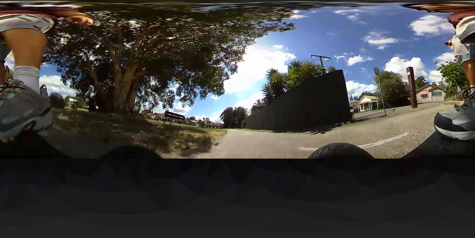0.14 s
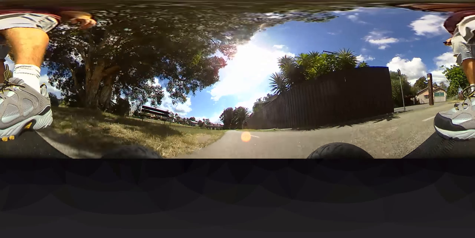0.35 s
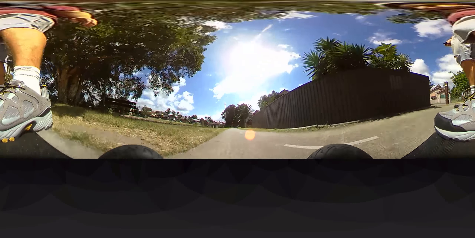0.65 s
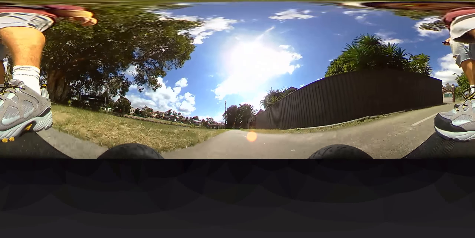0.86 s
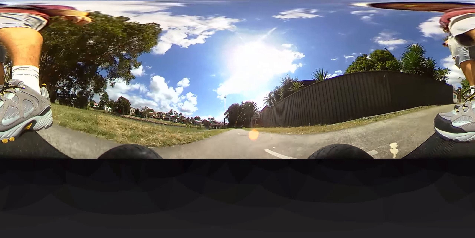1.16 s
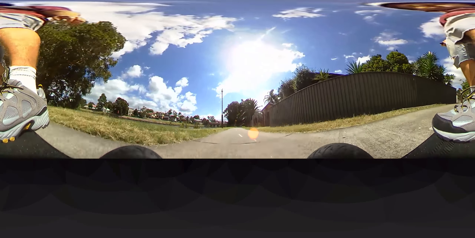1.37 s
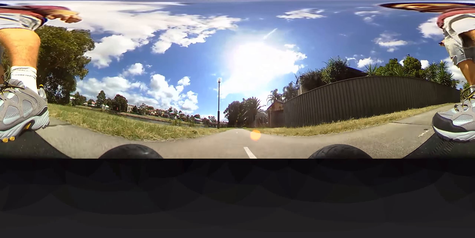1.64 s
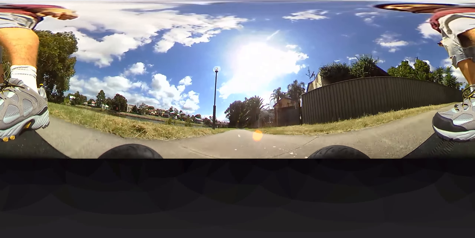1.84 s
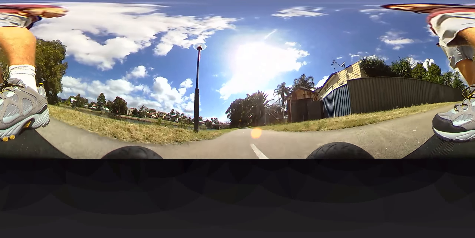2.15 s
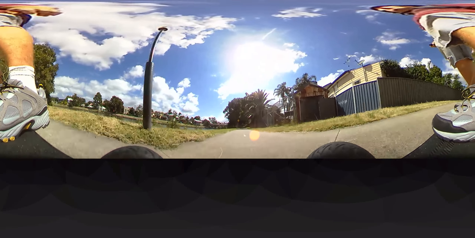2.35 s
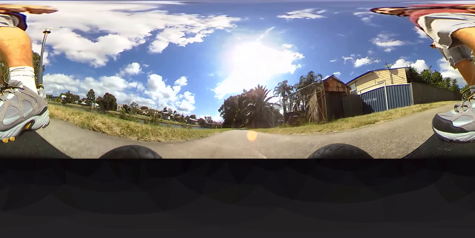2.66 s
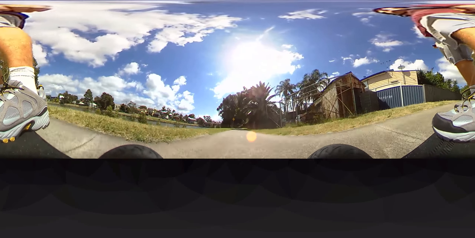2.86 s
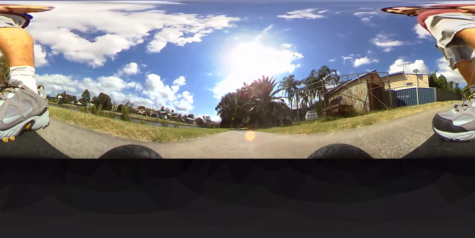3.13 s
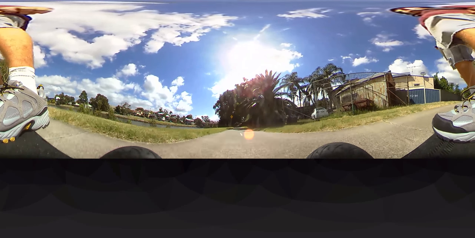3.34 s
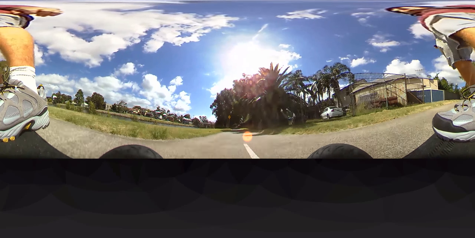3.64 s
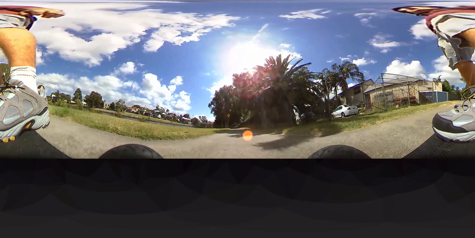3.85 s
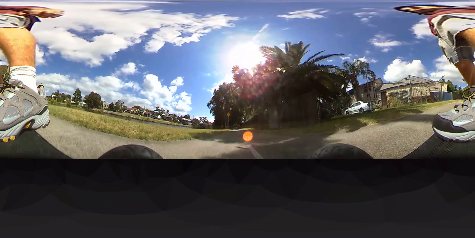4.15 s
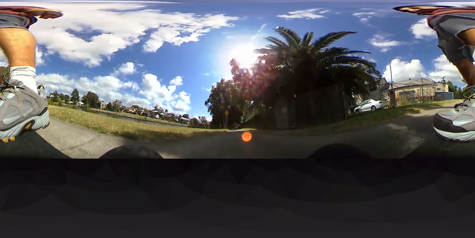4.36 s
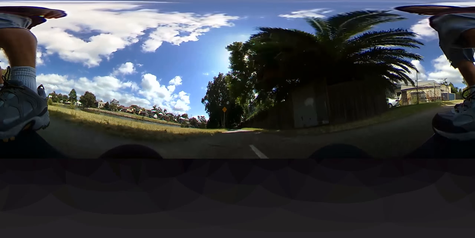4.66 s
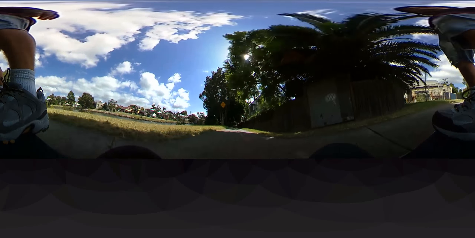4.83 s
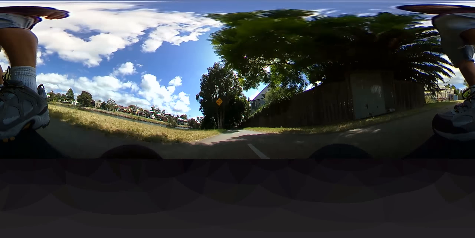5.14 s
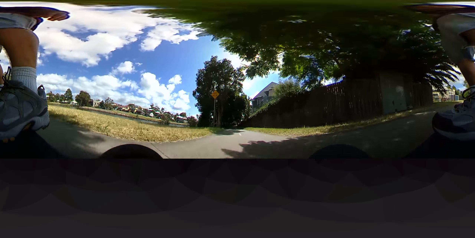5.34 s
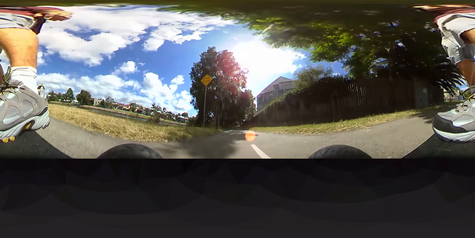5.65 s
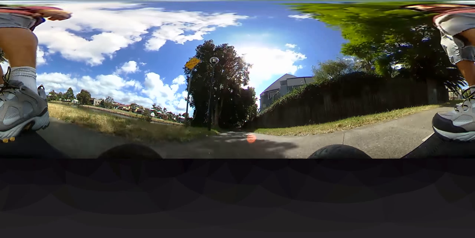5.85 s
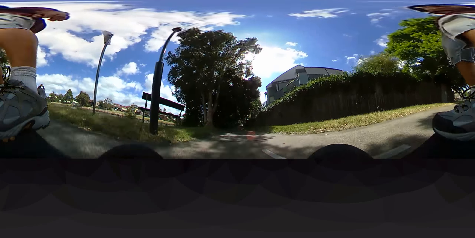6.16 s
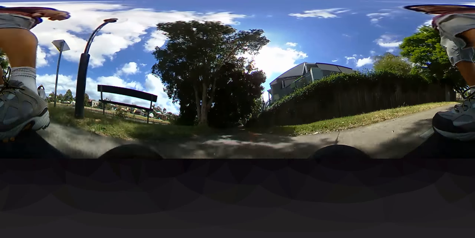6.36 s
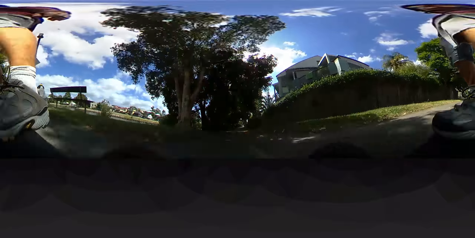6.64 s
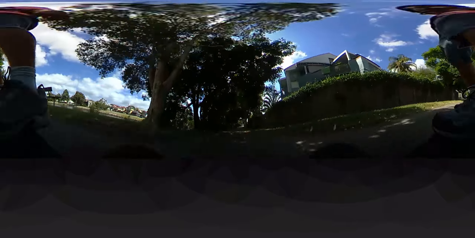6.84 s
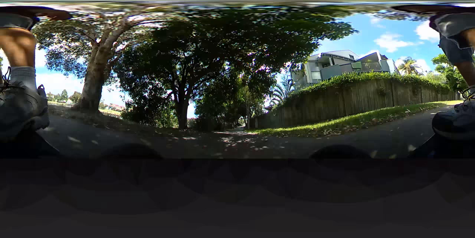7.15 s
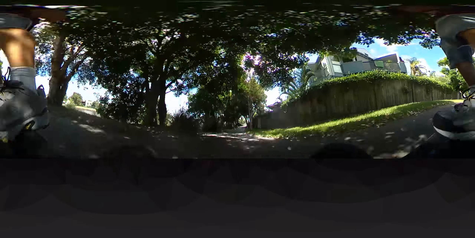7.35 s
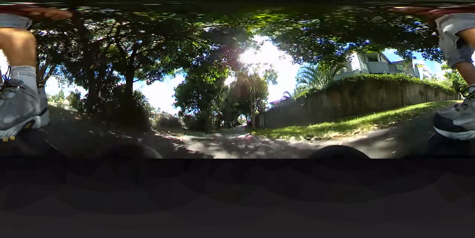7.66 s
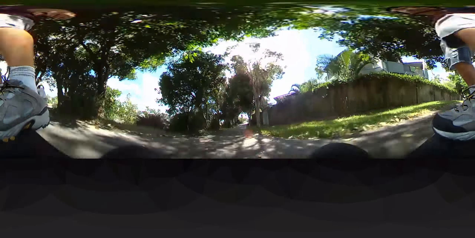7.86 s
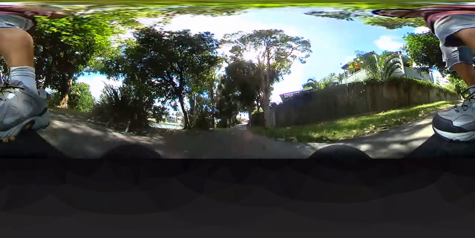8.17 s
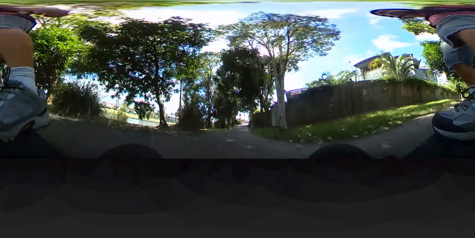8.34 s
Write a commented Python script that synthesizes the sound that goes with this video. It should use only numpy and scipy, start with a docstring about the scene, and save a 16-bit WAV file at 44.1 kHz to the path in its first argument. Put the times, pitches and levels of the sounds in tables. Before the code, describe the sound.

Continuous close, bass-heavy rumble of soft skateboard wheels on rough paving, wavering between deck flutter and a roughly 65 hertz motor hum. A faint, blurred whine near 1 kilohertz rises very slightly. A loose plastic case snaps, ticks and rattles at uneven intervals, while cracks give short hard thuds and stones knock the axles. The deck-mounted microphone sounds compressed, slightly clipped and dry, outdoors.

```python
"""Rough paving, over which an electric skateboard rolls fast, heard by a camera fixed to the deck.
Filtered noise gives the tyre roar, the hiss of grit and the bending resonances of the deck; phase-wandering
sines give the hum of the motor shaft and the whine of its belt. Cracks push and stones knock; the loose
camera case clicks, ticks and rattles as struck modes, and a far bird warbles twice.
A quick gain control holds the level nearly flat."""
import sys
import numpy as np
from scipy import signal
from scipy.io import wavfile
from scipy.ndimage import uniform_filter1d

SR = 44100
rng = np.random.default_rng(int(sys.argv[2]) if len(sys.argv) > 2 else 0)


def waveform_to_disk(signal):
    """Save audio, clipped to [-1, 1], as 16-bit WAV at the path in sys.argv[1]."""
    frames = np.transpose(np.atleast_2d(signal))
    scaled = np.clip(frames, -1, 1) * 32767
    samples = np.round(scaled).astype(np.int16)
    wavfile.write(sys.argv[1], SR, samples)


N = 374850
TIME = np.arange(N) / SR  # s

# All source levels hold ahead of the gain control.
# Rotation of the motor shaft. Each row: time in seconds, speed in Hz.
SHAFT_SPEED = [(0, 62.9), (.55, 63.1), (1, 62.3), (1.6, 63.6), (2, 63.8), (2.3, 64.5), (2.55, 65.5),
               (3.3, 65.8), (3.6, 66.1), (5.1, 66.3), (5.28, 65.8), (5.9, 66.6), (6.2, 65.8), (6.5, 66.7),
               (7, 65.4), (7.3, 66), (7.56, 65.05), (7.9, 65.7), (8.25, 66.7), (8.5, 66.3)]
TEETH, BUZZ_ORDER = 15, 23.5  # belt teeth per shaft turn; the buzz, in multiples of the shaft speed
# Levels of the ride. Each row: time in seconds, deck flex in dB, shaft hum in dB, tyre roar in dB.
RIDE_LEVELS = [(0, -22.5, -25, -24), (.15, -22, -21, -19.5), (.7, -21, -25.5, -19.5),
               (.9, -19, -17.5, -17.5), (1.2, -30, -17.5, -19), (1.45, -26, -24, -26),
               (1.8, -15, -34.5, -23.5), (2.3, -20.5, -18.5, -21.5), (2.6, -30, -22, -21),
               (3, -14.5, -23.5, -22), (3.3, -26, -22.5, -21), (3.45, -29.5, -29.5, -24),
               (3.6, -28.5, -24.5, -20.5), (3.9, -15.5, -23, -20), (4.3, -28.5, -27, -21),
               (4.48, -30, -15, -18), (4.7, -18.5, -28.5, -20.5), (4.95, -24, -38.5, -21.5),
               (5.25, -23, -23.5, -22.5), (5.65, -26, -20, -20), (5.85, -39.5, -21.5, -19.5),
               (6.15, -31, -16.5, -23), (6.4, -21, -24, -20.5), (6.7, -22, -26, -17.5),
               (6.9, -32.5, -15, -17), (7.15, -15.5, -26, -21), (7.38, -29, -22.5, -18.5),
               (7.7, -14, -33.5, -20), (8, -14.5, -30, -21), (8.15, -31.5, -22, -21),
               (8.45, -17, -33, -21.5), (8.5, -40, -37, -26)]
# Levels of belt and grit. Each row: time in seconds, belt whine in dB, its octave in dB, fizz in dB.
WHINE_LEVELS = [(0, -60, -69, -75), (.2, -49, -60, -89), (.45, -51, -63.5, -71), (.73, -52.5, -58, -70),
                (1.06, -51, -60.5, -69.5), (1.5, -56, -73, -74), (2.01, -49, -63.5, -73),
                (2.8, -52, -68.5, -74), (4.3, -49.5, -70, -78.5), (4.95, -50.5, -67, -68),
                (5.3, -50, -67.5, -78), (5.9, -48, -64.5, -77), (6.3, -50.5, -65.5, -79),
                (6.6, -49.5, -75, -75), (7.3, -49, -67, -71.5), (7.9, -50.5, -70, -69.5),
                (8.5, -50, -71, -79)]
# Noise bands about the belt tone, its octave and the buzz.
# Each row: width in Hz, level in dB above the tone that it follows.
FUZZ_BANDS = [(60, -9.5), (70, -8.5), (59, -1.5)]
# Bending modes of the deck. Each row: frequency in Hz, width scale in Hz, relative level in dB.
DECK_MODES = [(32.5, 13, -9), (39.12, 6.8, 0), (51.7, 8.2, -9.5)]
# Spectrum of the tyre roar. Each row: frequency in Hz, relative density in dB per Hz.
ROAR_SPECTRUM = [(40, -31), (85, -10), (113, -4.5), (170, -5), (220, 2), (298, -8), (430, -6.5), (540, -18),
                 (660, -24.5), (800, -35.5), (1000, -35), (1250, -49), (1540, -44), (1770, -54.5),
                 (1980, -52), (2380, -54), (2650, -80), (6000, -73.5)]
# Spectrum of the hiss of grit. Each row: frequency in Hz, relative density in dB per Hz.
HISS_SPECTRUM = [(1470, -32), (2500, 2.5), (3410, -15), (4300, -1), (5640, 2.5), (8040, -8), (13500, -14),
                 (14600, -11.5), (15100, -50.5)]
# The wheels unload over a seam. Each row: time in seconds, length in seconds, depth in dB.
SEAM_LIFTS = [(1.037, 0.27, -10), (4.832, 0.065, -12), (6.433, 0.08, -14), (7.906, 0.065, -11)]
# A loose part rattles lightly inside the case. Each row: time in seconds, level in dB.
RATTLE_BLOWS = [(0.1264, -45), (0.1434, -42), (0.1764, -47), (0.1874, -47), (0.1964, -44), (0.1994, -45),
                (0.2064, -42), (0.3864, -54), (0.396, -38), (0.5756, -43), (0.637, -41), (0.6644, -48),
                (1.0355, -52), (1.6387, -51), (1.7005, -44), (1.7848, -38), (1.8507, -35), (1.8981, -57),
                (2.2588, -45), (2.4728, -44), (3.2016, -57), (3.3104, -49), (3.3274, -47), (3.3404, -52),
                (3.3942, -57), (3.457, -51), (3.5967, -58), (3.7229, -47), (3.7324, -44), (3.7928, -46),
                (3.8354, -47), (3.9174, -60), (4.0617, -42), (4.8504, -48), (5.0814, -51), (5.2944, -51),
                (5.3702, -60), (5.6057, -45.5), (5.7982, -54), (5.9663, -66), (5.9824, -54), (6.0392, -47),
                (6.0674, -58), (6.1145, -64), (6.1424, -63), (6.2644, -49), (6.2774, -45), (6.376, -50),
                (6.3795, -44), (6.3885, -44), (6.398, -46), (6.4477, -72), (6.5939, -42), (6.8568, -54),
                (7.3557, -44), (7.5622, -57), (7.664, -47), (7.8446, -46), (8.1938, -46), (8.3384, -51)]
# Modes of the loose part. Each row: frequency in Hz, level in dB, decay time t60 in seconds.
RATTLE_MODES = [(4370, -1, 0.0075), (5140, -5.5, 0.0019), (6040, -2.5, 0.0034), (7900, -4, 0.0027)]
# The case falls back on a softer stop. Each row: time in seconds, level in dB.
TICK_BLOWS = [(0.1206, -52), (0.1511, -34), (0.2523, -45), (0.2833, -50), (0.3142, -38), (0.3476, -40),
              (0.3785, -39), (0.4489, -55), (0.4803, -44), (0.7936, -43), (0.946, -43), (1.257, -47),
              (1.536, -51), (1.5663, -49), (1.6008, -31), (1.731, -37), (1.7749, -51), (1.8078, -48),
              (1.9028, -54), (2.0104, -44), (2.1115, -40), (2.1405, -40), (2.1755, -51), (2.381, -46),
              (2.4892, -41), (2.525, -38), (2.6439, -48), (2.7662, -50), (3.2181, -42), (3.252, -37),
              (3.3194, -41), (3.3523, -46), (3.441, -40), (3.4755, -40), (3.5114, -43), (3.6404, -45),
              (3.6716, -36), (3.7055, -42), (3.7394, -43), (3.8416, -45), (3.928, -53), (3.9992, -39),
              (4.119, -42), (4.2916, -33), (4.5994, -52), (4.8045, -41), (4.8709, -39.5), (4.8993, -41),
              (4.996, -42), (5.094, -43), (5.1262, -40), (5.637, -40), (5.666, -45), (5.7394, -44),
              (5.8686, -40.5), (6.2638, -45), (6.5589, -38), (7.888, -46), (7.9867, -48), (8.432, -39)]
# Modes of the soft stop. Each row: frequency in Hz, level in dB, decay time t60 in seconds.
STOP_MODES = [(1500, -1, .012), (2720, 0, .013), (4250, -6, .007), (5550, -13, .004)]
# The case snaps against its mount. Each row: time in seconds, level in dB.
CLICK_BLOWS = [(.1339, -22), (.1361, -21), (.164, -14.5), (.1679, -26), (.2321, -14.5), (.2342, -28),
               (.2654, -30), (.2968, -17), (.3293, -18), (.3624, -13.5), (.4004, -48), (.4675, -21.5),
               (.5343, -33), (.9667, -41), (1.1892, -44), (1.4361, -36.5), (1.5146, -16.5), (1.5287, -30),
               (1.5515, -29), (1.5873, -31), (1.6615, -23), (1.7151, -29), (1.7905, -31), (1.8225, -22.5),
               (1.9261, -27.5), (1.9585, -25), (1.9743, -36), (1.9962, -30), (2.0958, -21), (2.1252, -23),
               (2.1559, -30), (2.3694, -18), (2.3942, -30), (2.3982, -45), (2.8576, -25), (3.0573, -50),
               (3.0771, -35.5), (3.2732, -22.5), (3.3022, -43), (3.3344, -43), (3.4603, -30.5),
               (3.4924, -28.5), (3.5261, -24.5), (3.7546, -15.5), (3.8268, -39), (3.9065, -44),
               (4.1306, -35.5), (4.1732, -25.5), (4.202, -20), (4.2039, -22.5), (4.2402, -41),
               (4.2757, -19.5), (4.3064, -19.5), (4.791, -28.5), (4.8203, -33), (4.8813, -24),
               (4.9179, -24), (4.983, -24.5), (5.011, -32), (5.111, -28.5), (5.3336, -31.5), (5.9054, -49),
               (6.0579, -41), (6.3825, -23), (6.3862, -40), (6.391, -37), (6.3955, -43), (6.4104, -31.5),
               (6.6132, -27.5), (6.6154, -36), (6.6498, -35), (7.1425, -34.5), (7.3688, -27), (7.632, -34),
               (7.8588, -24.5), (7.902, -33), (7.93, -29), (7.9781, -42), (8.2541, -23.5), (8.3523, -31),
               (8.3837, -33.5), (8.4227, -36)]
# Modes of the case. Each row: frequency in Hz, level in dB, decay time t60 in seconds.
CASE_MODES = [(1607, -9.5, 0.015), (1942, -9.5, 0.0083), (2360, -19.5, 0.021), (2750, 6, 0.0018),
              (4760, 8, 0.0019), (7260, 12, 0.0011), (9060, 15, 0.00076), (11200, -3.5, .001),
              (12400, -10, 0.002), (12700, -21, 0.00072)]
# Wheels hit cracks. Each row: time in seconds, level in dB, length scale of the push in seconds.
CRACKS = [(.1365, -5, .0019), (.1672, -2.5, .0024), (.2995, -4, .002), (.365, -4, .0019),
          (.4875, -4, .0023), (.5585, -4, .0024), (1.5163, 1, .0027), (1.5302, -2, .0035),
          (2.1851, -5, .0028), (2.3719, 4, .0026), (3.7573, -1, .0022), (4.1757, -4, .0026),
          (4.2043, -1, .0023), (4.2875, -4, .0024), (4.5653, -5, .0028), (4.9852, -4, .0022),
          (5.84, -4.5, .0022), (6.3711, 6, .0034), (7.0986, -2.5, .0028), (7.3711, 1.5, .002),
          (7.6786, -4, .0028), (8.142, -5, .0024), (8.2565, 0, .0025)]
# The deck rings after a crack. Each row: frequency in Hz, level in dB, decay time t60 in seconds.
THUMP_MODES = [(72.4, 0.5, 0.041), (120, -6.5, 0.045), (192, -7.5, 0.038), (393, -8.5, 0.033),
               (640, -22.5, 0.026)]
# Larger stones knock the axles. Each row: time in seconds, level in dB before softening.
STONE_KNOCKS = [(.229, -5), (.295, -12), (.36, -14), (.466, -11), (.631, -8), (.712, -17), (.752, -11),
                (1.434, -16.5), (1.513, -18), (1.925, -24), (2.124, -21), (2.3685, -8.5), (2.853, -11),
                (2.925, -13.5), (3.024, -20), (3.269, -13), (3.3, -21), (3.491, -18), (3.705, -14),
                (3.754, -38), (4.036, -7), (4.2, -14), (4.273, -9.5), (4.35, -17), (4.689, -15),
                (4.745, -12), (4.916, -15), (5.126, -14.5), (5.961, -26), (6.041, -12), (6.367, -7),
                (6.557, -31), (6.595, -17), (6.694, -12.5), (6.785, -24), (6.972, -14), (7.244, -18),
                (7.545, -30), (7.581, -32), (7.842, -9.5)]
# Modes of the axles. Each row: frequency in Hz, level in dB, decay time t60 in seconds.
AXLE_MODES = [(273, -5, 0.069), (415.4, 2.5, 0.064), (597, -15, 0.088), (913, -17.5, 0.038),
              (1500, -7.5, 0.0027)]
# Notes of a far bird. Each row: start in seconds, length in seconds, mean frequency in Hz, level in dB.
BIRD_NOTES = [(3.71, 0.076, 6940, -67), (4.628, .075, 6740, -67)]

SEESAW_S, FLEX_SEESAW_DB, HUM_SEESAW_DB = 0.043, 7.5, 3  # smoothing time; dB per unit of seesaw
JOLT_S, JOLT_SHARE = 0.015, 0.68  # the load just before a lift, as a share of its depth
JITTER_PER_S, JITTER_DB, SHAKEN_DB = 64, -64.5, 15.5  # faint rattles, and their rise at full shaking
SETTLE_S, SHAKEN_FIZZ_DB = 0.029, 12  # decay of the shaking; its lift of the fizz when full
THUMP_DB = -8  # ringing of the deck relative to the push
RISE_S = 0.00019  # onset time of every ring
SPOT_DB = 5  # rms spread of a rattle's modes from blow to blow
SENSED_PEAK = .55  # amplitude above which the gain control feels no more
EDGE_HZ = 14650  # upper band limit


def gain_of(db):
    """Decibels express an amplitude ratio."""
    return 10 ** (np.asarray(db) / 20)


def evened(x):
    """Division by the root mean square gives rms 1."""
    return x / np.sqrt(np.mean(x ** 2) + 1e-20)


def curve(rows, axis):
    """Linear interpolation turns one column into a signal."""
    return np.interp(TIME, [r[0] for r in rows], [r[axis] for r in rows])


def drift(seconds):
    """Twice-averaged white noise wanders slowly, with rms 1."""
    width = max(int(seconds * SR), 1)
    once = uniform_filter1d(rng.standard_normal(N), width, mode="wrap")
    return evened(uniform_filter1d(once, width, mode="wrap"))


def resonate(x, hz, width):
    """Heterodyning: hz is shifted to zero, smoothed and shifted back, a resonance of gain 1."""
    turn = np.exp(2j * np.pi * np.cumsum(hz * np.ones(N)) / SR)
    r = np.exp(-np.pi * width / SR)
    return 2 * (turn * signal.lfilter([1 - r], [1, -r], x / turn)).real


def coloured(x, points):
    """A minimum-phase filter shapes the spectrum causally; the result has rms 1."""
    f, db = np.transpose(points)
    hz = abs(np.fft.fftfreq(8192, 1 / SR))
    spectrum_db = np.interp(np.log(hz + 1), np.log(f), db)
    log_gain = np.log(gain_of(np.maximum(spectrum_db, -100)))
    # the Hilbert transform of the log gain gives the minimum phase
    taps = np.fft.ifft(np.exp(np.conj(signal.hilbert(log_gain)))).real[:4096]
    return evened(signal.oaconvolve(x, taps)[:N])


def grains(per_s, spread_db):
    """A random point process: sparse impulses, a few of them large."""
    sizes = gain_of(spread_db * np.minimum(rng.exponential(1, N), 5))
    return sizes * (rng.random(N) < per_s / SR)


def train(rows):
    """Each row excites by one impulse at its time and level."""
    out = np.zeros(N)
    for s, db in rows:
        out[round(s * SR)] += gain_of(db)
    return out


def struck(blows, modes):
    """Modal superposition: each blow rings the same decaying sines, scaled to a peak of 1."""
    t = np.arange(4000) / SR
    ring = sum(gain_of(db - 60 * t / t60) * np.sin(2 * np.pi * hz * t) for hz, db, t60 in modes)
    ring = ring * (1 - np.exp(-t / RISE_S))
    return signal.oaconvolve(blows, -ring / abs(ring).max())[:N]


def scuffed(blows, seconds, share):
    """Sliding contact: each blow drags a short ragged chatter behind it."""
    tail = signal.lfilter([1], [1, -np.exp(-1 / (seconds * SR))], blows)
    return blows + share * tail * rng.standard_normal(N) * (rng.random(N) < .15)


def scattered(blows, modes):
    """Excitation depends on position: each blow lands on another spot and wakes the modes unevenly."""
    return sum(gain_of(db + SPOT_DB * drift(.004)) * struck(blows, [(hz, db, t60)])
               for hz, db, t60 in modes) / 3


def deck(seesaw):
    """Forced bending: road noise shakes the modes; the random envelope is evened to follow the level curve."""
    road = rng.standard_normal(N)
    flex = np.zeros(N)
    for hz, w, db in DECK_MODES:
        mode = resonate(resonate(road, hz, 1.93 * w), hz, 1.93 * w)
        flex += gain_of(db) * evened(mode)
    envelope = uniform_filter1d(abs(signal.hilbert(evened(flex))), int(0.03 * SR))
    level_db = curve(RIDE_LEVELS, axis=1) + FLEX_SEESAW_DB * seesaw
    return gain_of(level_db) * evened(flex / (envelope + 0.047))


def unloading():
    """Contact force sets the wheels' level in dB: it swells at a seam and sinks while they barely touch."""
    change_db = np.zeros(N)
    for s, length, db in SEAM_LIFTS:
        change_db += db * np.exp(-(2 * (TIME - s) / length) ** 4)
        jolt = np.exp(-((TIME - s + length / 2 + JOLT_S) / JOLT_S) ** 2)
        change_db -= JOLT_SHARE * db * jolt
    return change_db


def motor(seesaw):
    """Rotating imbalance hums; belt teeth whine at their meshing rate, shaken and blurred by the road."""
    speed = curve(SHAFT_SPEED, axis=1)
    turns = np.cumsum(speed) / SR
    hum_turns = turns + 0.081 * drift(0.015) + .05 * drift(.06)
    hum_db = curve(RIDE_LEVELS, axis=2) + 2.0 * drift(0.017) + unloading() - HUM_SEESAW_DB * seesaw
    hum = np.sqrt(2) * np.sin(2 * np.pi * hum_turns) * gain_of(hum_db)
    mesh = TEETH * turns + 0.075 * drift(0.013) + 0.11 * drift(0.09)
    blur = []
    for order, (w, db) in zip((TEETH, 2 * TEETH, BUZZ_ORDER), FUZZ_BANDS):
        band = evened(resonate(rng.standard_normal(N), order * speed, w))
        blur.append(gain_of(db + 4.8 * drift(0.023)) * band)
    tone = gain_of(2.2 * drift(0.015)) * np.sin(2 * np.pi * mesh)
    first = gain_of(curve(WHINE_LEVELS, axis=1)) * (tone + blur[0])
    octave = gain_of(2.5 * drift(.012)) * np.sin(2 * np.pi * (2 * mesh + .09 * drift(.005)))
    upper = gain_of(curve(WHINE_LEVELS, axis=2)) * (octave + blur[1] + blur[2])
    return hum + gain_of(unloading()) * (first + upper)


def shaking():
    """Transient response: each snap, loud or soft, shakes the case almost alike, 0-1, and it dies away."""
    decay = np.exp(-1 / (SETTLE_S * SR))
    shaken = signal.lfilter([1], [1, -decay], train(CLICK_BLOWS) ** 0.039)
    return np.tanh(uniform_filter1d(shaken, int(0.019 * SR)))


def tyres():
    """Rolling contact: stones press into the rubber in lumps, which also modulate the hiss of fine grit."""
    lumps = drift(0.0092)
    stones = evened(grains(500, 2.1) * rng.choice([-1., 1.], N)) + 0.91 * rng.standard_normal(N)
    roar_db = curve(RIDE_LEVELS, axis=3) + unloading()
    roar = gain_of(roar_db) * coloured(stones * gain_of(2.9 * lumps), ROAR_SPECTRUM)
    hiss_db = 2.5 * np.tanh(.6 * lumps + .5 * drift(.02))
    hiss = coloured(rng.standard_normal(N) * gain_of(hiss_db), HISS_SPECTRUM)
    # each flying speck hits one spot of the case and wakes one mode
    specks = sum(struck(scuffed(grains(140, 4.2), 0.0071, 0.82), [mode]) for mode in CASE_MODES[3:7])
    fizz_db = curve(WHINE_LEVELS, axis=3) + SHAKEN_FIZZ_DB * shaking() + .6 * unloading()
    fizz = gain_of(fizz_db) * (0.6 * hiss + 1.1 * evened(specks))
    faint_ticks = struck(scuffed(gain_of(-69) * grains(29, 2.4), 0.0021, 1.0), STOP_MODES)
    return roar + fizz + faint_ticks


def jitters():
    """Random excitation: faint blows that strengthen while the case shakes."""
    return gain_of(JITTER_DB + SHAKEN_DB * shaking()) * grains(JITTER_PER_S, 3.8)


def rattles():
    """Repeated impact: a loose part inside the case rings unevenly under listed and random blows."""
    return scattered(scuffed(train(RATTLE_BLOWS) + jitters(), 0.00068, 0.2), RATTLE_MODES)


def ticks():
    """Compliant impact: the soft stop rounds each blow of the case and rings."""
    return struck(uniform_filter1d(scuffed(train(TICK_BLOWS), .0015, .07), size=2), STOP_MODES)


def clicks():
    """Hard impact: a snap against the mount rings the modes of the case."""
    return struck(scuffed(train(CLICK_BLOWS), 0.0015, 0.3), CASE_MODES)


def bumps():
    """Impulsive load: a crack gives a short push with steep sides in a shallow dip, and the deck rings."""
    out = np.zeros(N)
    for s, db, length in CRACKS:
        u = (TIME - s) / length
        out += gain_of(db) * (np.exp(-9 * abs(u) ** 1.99) - 0.18 * np.exp(-.6 * u ** 2))
    return out - gain_of(THUMP_DB) * struck(train([row[:2] for row in CRACKS]), THUMP_MODES)


def knocks():
    """Cushioned impact: the rubber softens each stone's knock into a short push that rings the axles."""
    push = uniform_filter1d(uniform_filter1d(train(STONE_KNOCKS), size=14), size=14)
    return -struck(push, AXLE_MODES)


def bird():
    """Frequency and amplitude modulation make thin warbling notes."""
    out = np.zeros(N)
    for s, length, hz, db in BIRD_NOTES:
        on = (TIME > s) & (TIME < s + length)
        cycles = np.cumsum(hz + 250 * drift(.002)) / SR
        out += on * gain_of(db + 3.3 * drift(.004)) * np.sin(2 * np.pi * cycles)
    return out


def scene():
    """Linear superposition of all sources; flex and hum trade strength at random."""
    seesaw = 1.6 * np.tanh(drift(SEESAW_S) / 1.3)
    rolling = deck(seesaw) + motor(seesaw) + tyres()
    case = rattles() + ticks() + clicks()
    return (rolling + case + bumps() + knocks() + bird())[None]


def record(dry):
    """Compression by a slightly lagging gain control, lopsided distortion and clipping, then the band limit."""
    width = int(0.0093 * SR)
    power = np.minimum(dry ** 2, SENSED_PEAK ** 2)
    for _ in range(2):
        power = uniform_filter1d(power, width, origin=width // 5)  # the origin makes it lag
    level_db = 10 * np.log10(abs(power) + 1e-12)
    held = dry / gain_of(0.74 * (level_db + 18.5))  # takes out 0.74 of the departure from -18.5 dB
    clipped = np.clip(held + .2 * held ** 2 - .002, -.69, .69)
    edge = signal.firwin(201, EDGE_HZ, window=("kaiser", 9), fs=SR)
    return signal.oaconvolve(np.pad(clipped, ((0, 0), (100, 100)), "edge"), edge[None], "valid")


dry = scene()
out = record(dry)
waveform_to_disk(out)
```